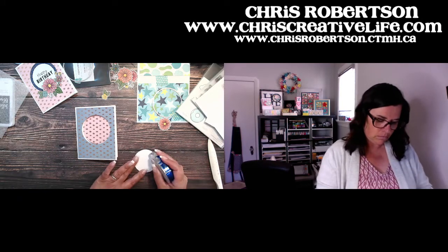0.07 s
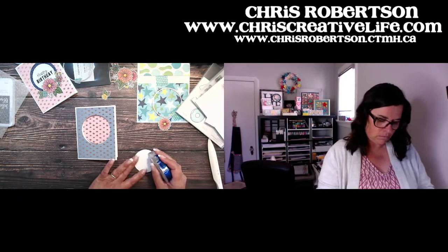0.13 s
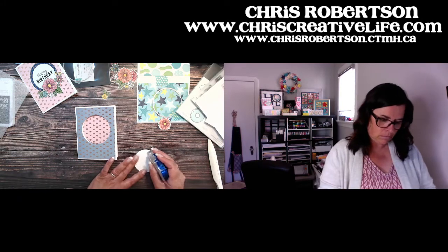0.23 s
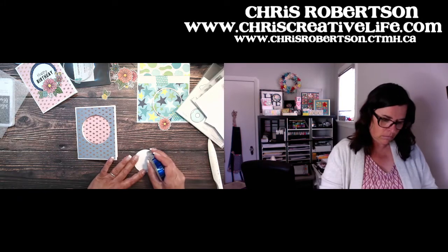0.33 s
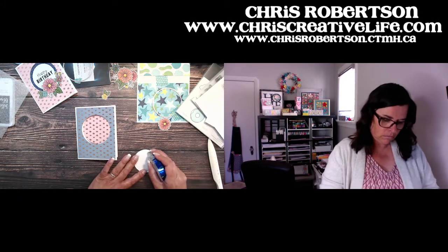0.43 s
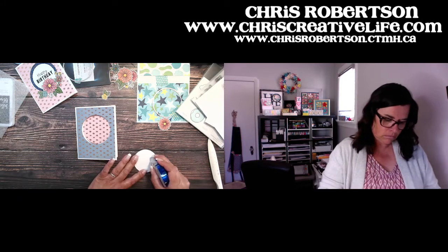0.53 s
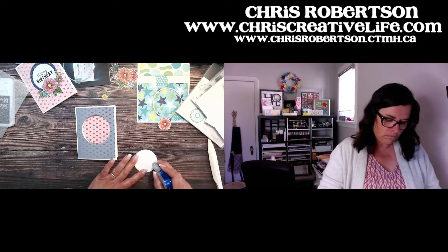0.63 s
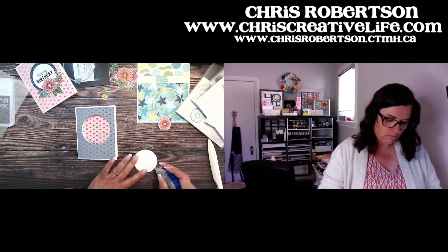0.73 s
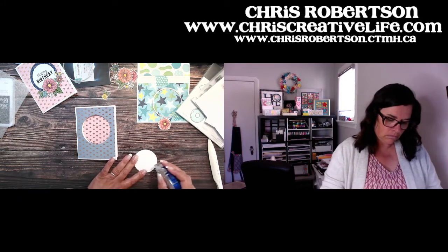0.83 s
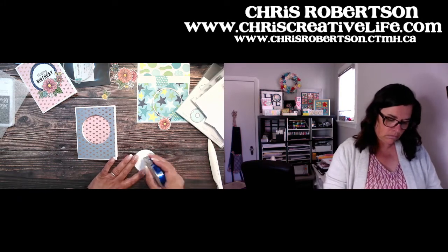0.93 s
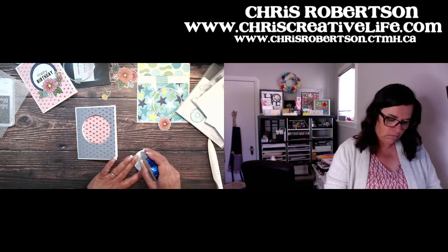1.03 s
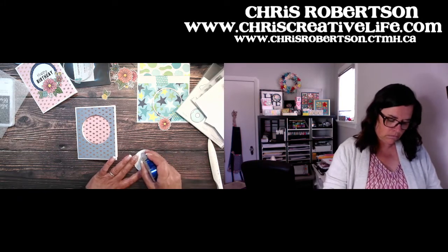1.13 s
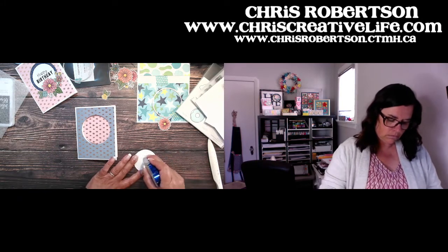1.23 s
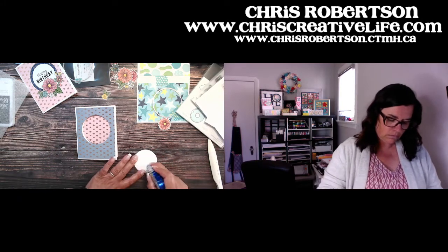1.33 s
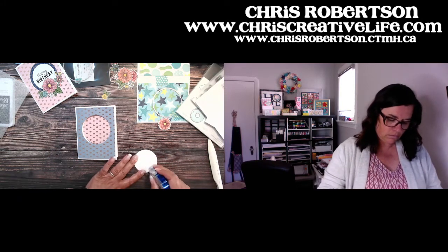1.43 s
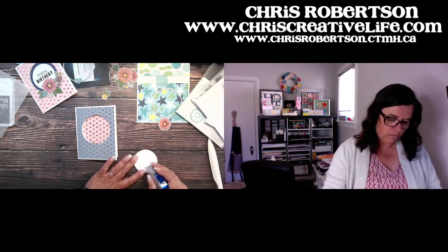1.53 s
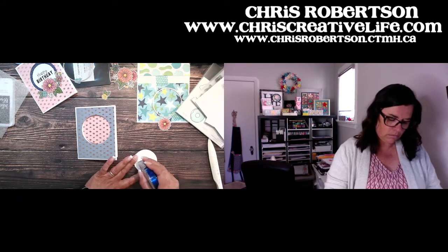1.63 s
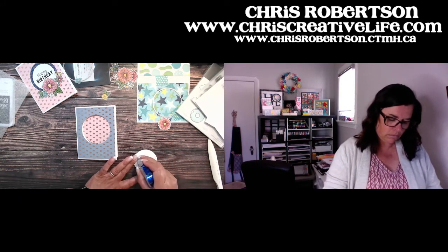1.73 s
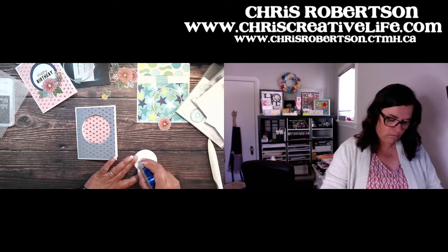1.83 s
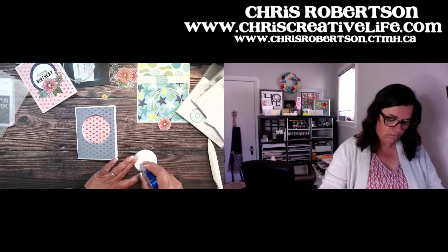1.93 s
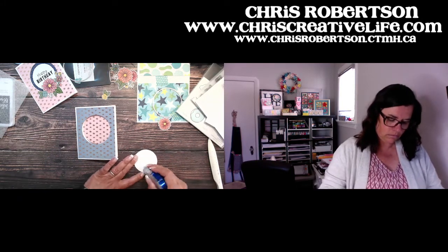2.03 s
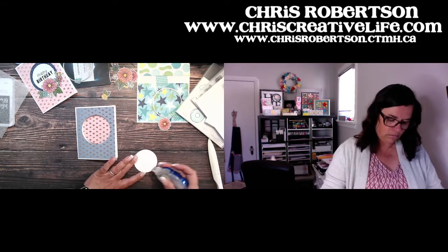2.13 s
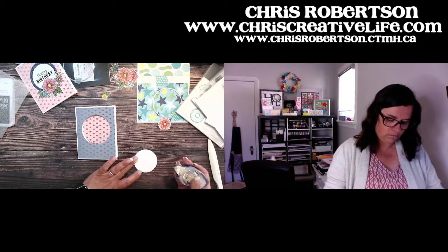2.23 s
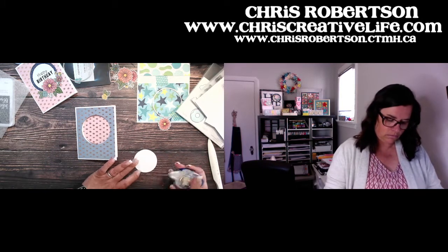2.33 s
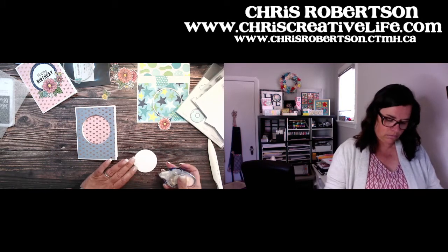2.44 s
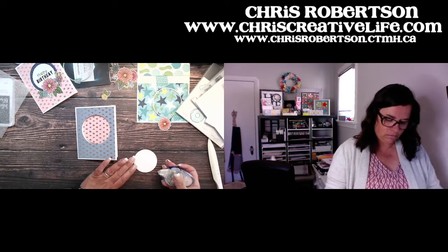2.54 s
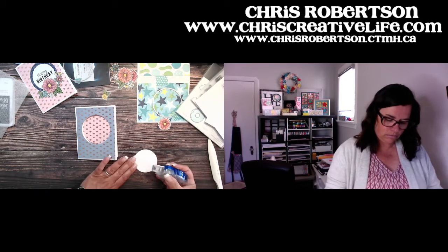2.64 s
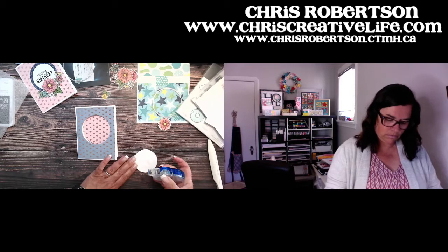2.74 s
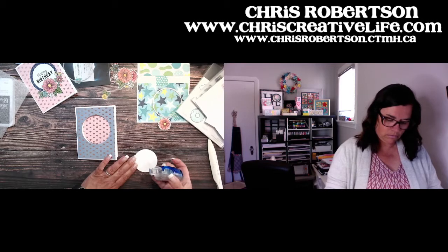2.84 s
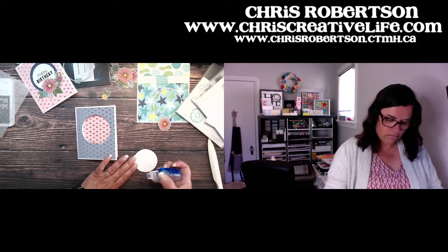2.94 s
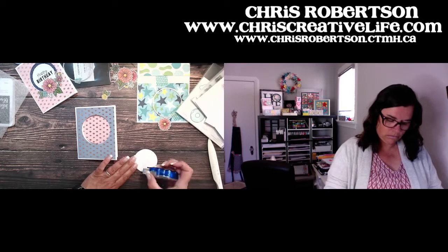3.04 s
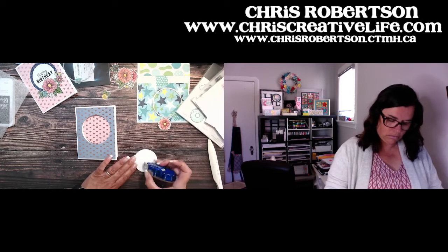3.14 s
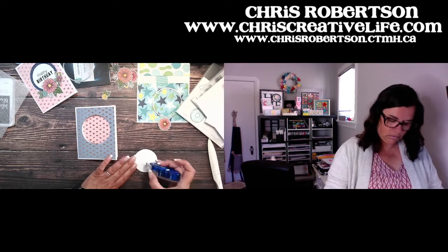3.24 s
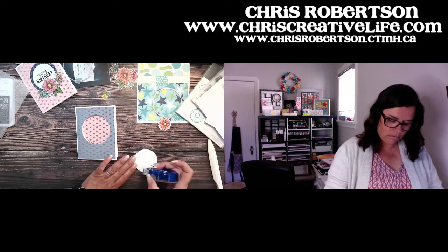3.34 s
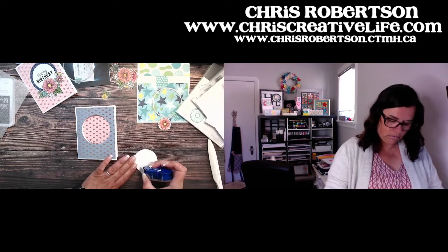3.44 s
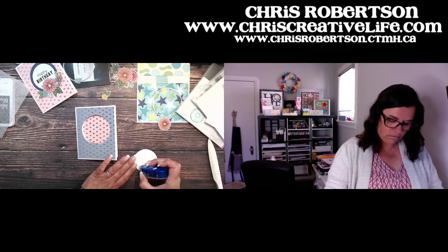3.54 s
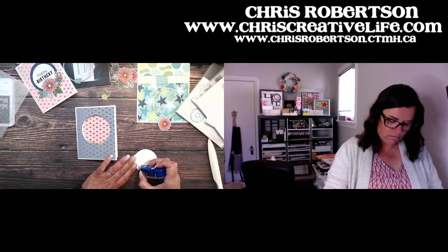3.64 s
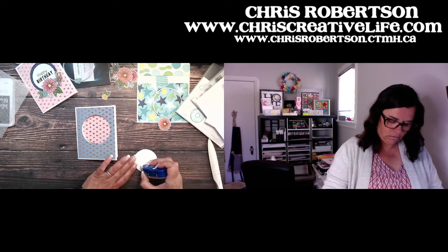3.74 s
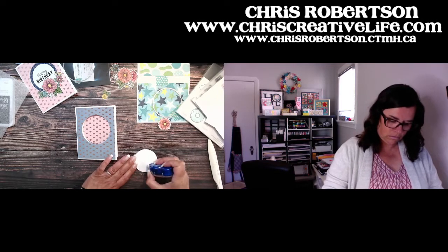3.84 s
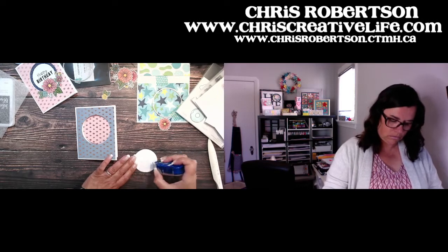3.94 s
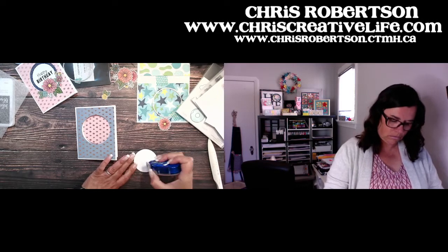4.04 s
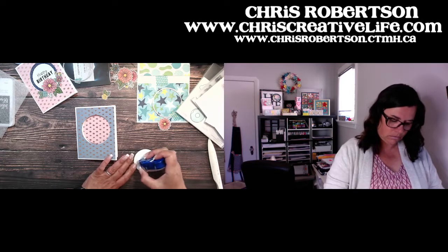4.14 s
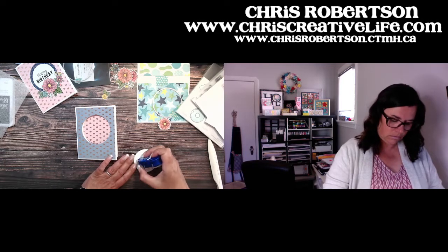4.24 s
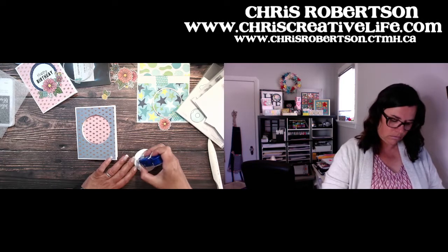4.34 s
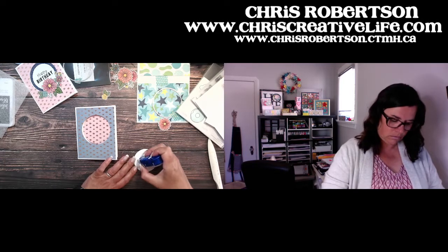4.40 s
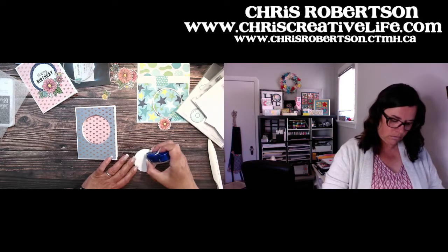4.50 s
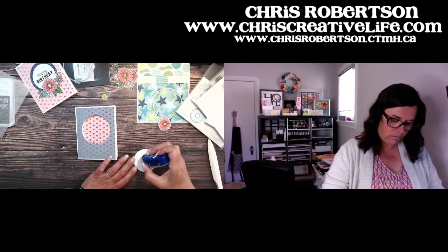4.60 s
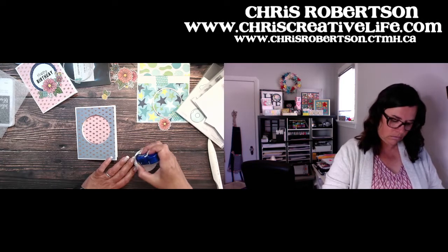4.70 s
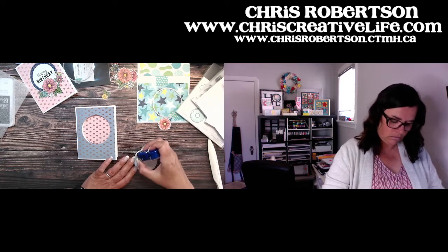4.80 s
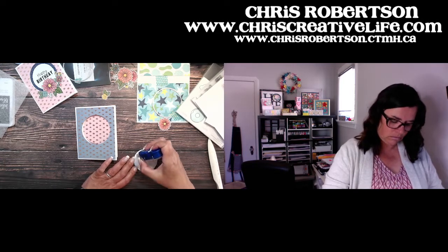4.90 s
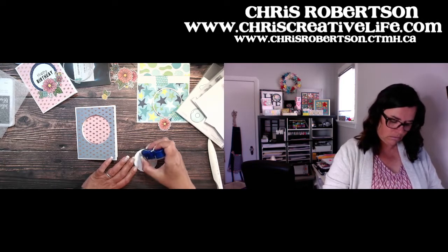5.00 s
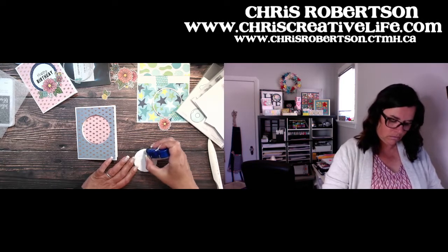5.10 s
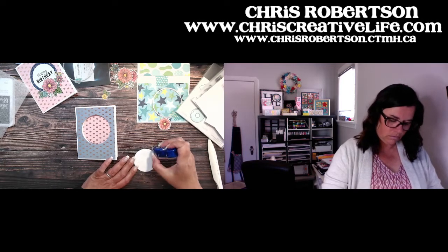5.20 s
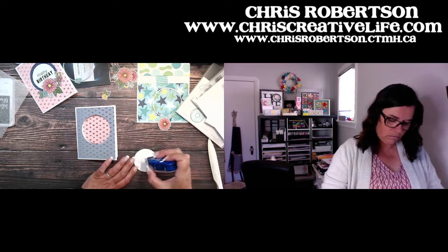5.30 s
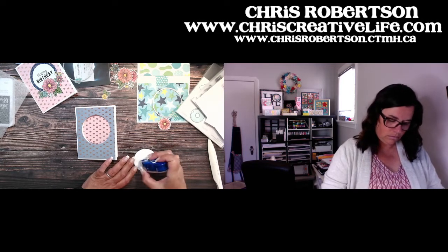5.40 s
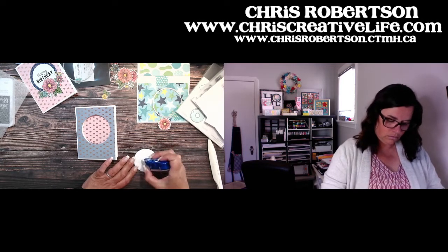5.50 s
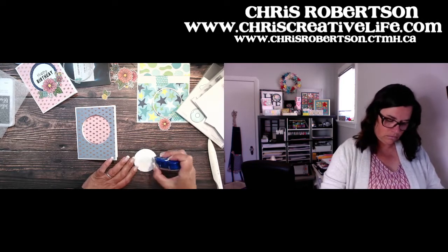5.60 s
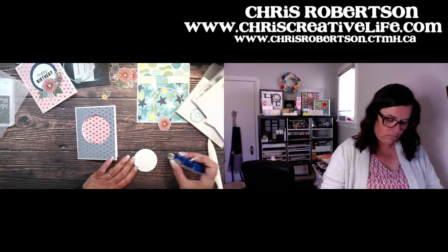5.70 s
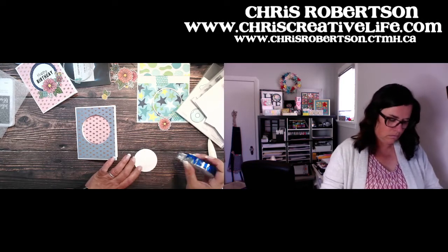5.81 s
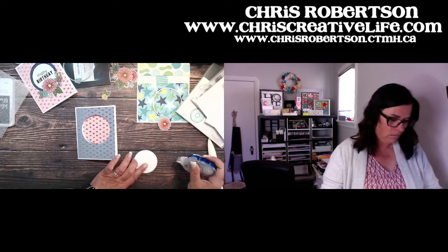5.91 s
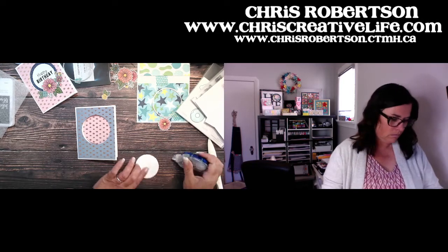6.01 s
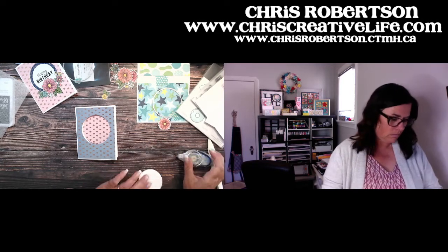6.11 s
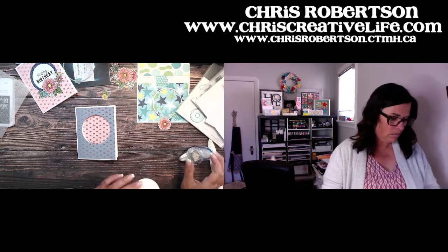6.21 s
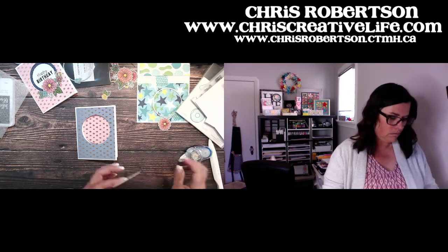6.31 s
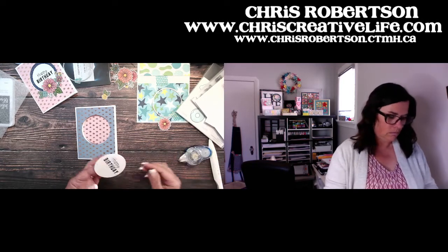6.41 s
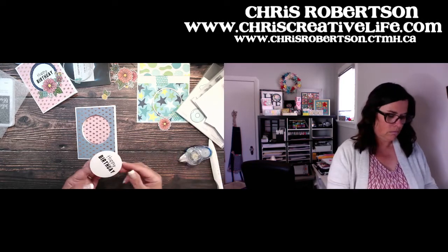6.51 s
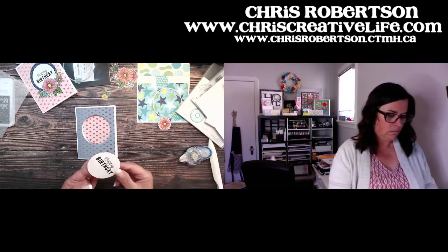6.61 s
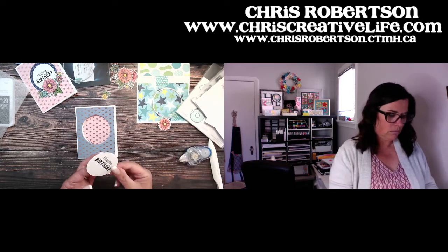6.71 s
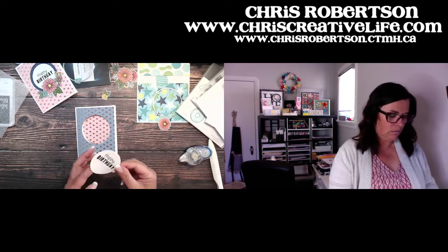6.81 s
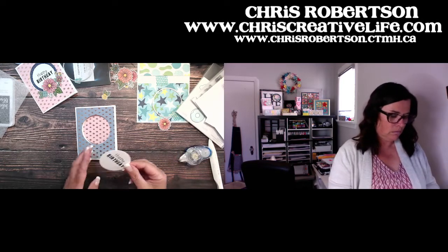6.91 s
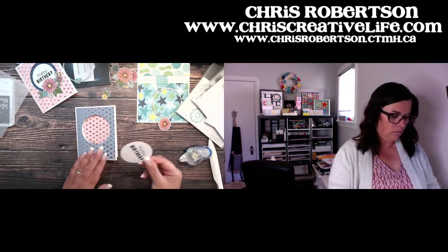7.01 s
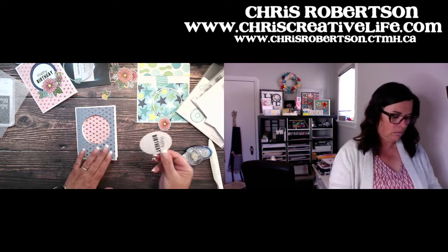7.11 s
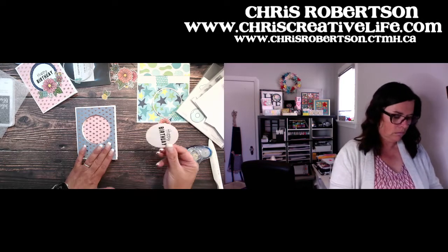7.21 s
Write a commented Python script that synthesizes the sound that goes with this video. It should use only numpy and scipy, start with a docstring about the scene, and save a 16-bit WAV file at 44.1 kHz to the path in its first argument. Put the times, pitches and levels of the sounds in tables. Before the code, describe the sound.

At a wooden craft table, a plastic tape runner makes three short ratcheting zips, bright clicks mixed with crackly peeling fizz, with stray slow ticks between. It is turned in the fingers with sharp little snaps, then four more brief zips follow. The runner is dropped, clattering and bouncing with a faint plastic ring, and fingers tick on paper. Close microphone, small room, faint low hum.

```python
"""A plastic tape runner is rolled over paper in seven short strokes: a pawl clicks over gear teeth (short puffs of
noise, each with its own pitch) while the tape peels off with a crackly fizz. Landings knock the wooden table;
a stand on it rings low (fading sine tones) and sways under the hand (slow noise). Fingers rustle on the paper and
the runner rattles in the hand (grainy noise). It is turned in the fingers, then dropped: a clatter of noise puffs
and a faintly ringing shell. All is heard from close by in a small room, over mains hum and soft room air."""
import sys
import numpy as np
from scipy import signal
from scipy.fft import rfft, irfft, next_fast_len
from scipy.io import wavfile
from scipy.ndimage import uniform_filter1d, map_coordinates

SR = 44100
rng = np.random.default_rng(int(sys.argv[2]) if len(sys.argv) > 2 else 0)


def file_out(sig):
    """Save sig as 16-bit WAV at sys.argv[1]."""
    # one column per channel
    cols = np.atleast_2d(sig).T
    # limit, then scale
    lim = np.clip(cols, -1, 1)
    pcm = np.round(lim * 32767).astype(np.int16)
    wavfile.write(sys.argv[1], SR, pcm)


def elevation(decibels):
    """Turn decibel levels (scalar or array-like) into linear amplitude ratios."""
    levels = np.asarray(decibels, float)
    return 10 ** (levels / 20)


N = 319748  # length in samples

# Room air. Each row: frequency in Hz, relative level in dB per Hz.
AIR_COLOUR = [(10, -13.5), (25, 0), (45, -2), (75, -5.5), (100, -9.5), (206, -15.5), (400, -22.5),
              (700, -30), (1400, -34.5), (7300, -42), (13600, -49), (16000, -51.5), (16600, -120)]
AIR_DB, HUM_DB, MAINS_HZ = -56.5, -49.5, 60  # rms levels, the hum's being its middle
# How fast the room falls silent. Each row: frequency in Hz, time to fade by 60 dB in seconds.
ROOM_FADE = [(300, 0.35), (1500, 0.31), (5000, 0.22), (12000, 0.16)]

# Full-roll strokes. Each row: start in seconds, hardest moment in seconds, end in seconds.
STROKE_TIMES = [(0.478, 0.69, 0.8), (1.208, 1.38, 1.49), (1.897, 2.05, 2.097), (3.803, 3.86, 3.926),
                (4.465, 4.52, 4.553), (4.935, 5.185, 5.237), (5.515, 5.655, 5.69)]
# The same strokes. Each row: rattle level in dB, weight of the hand on the table in dB.
STROKE_LEVELS = [(-38.5, -33), (-37.5, -30), (-40.5, -31.5), (-39.5, -36.5), (-38, -34), (-37, -37),
                 (-36.5, -42)]
RISE_DB_PER_S, FALL_DB_PER_S = 52, 85.5  # the rattle builds as the hand speeds up, eases off before the lift
TEETH_PER_S, SPEED_FOLLOWS = 112, 0.45  # at the hardest moment; dB of speed per dB of rattle
SLOW_BRIGHTENS = 0.32  # dB of tooth pitch gained per dB of lost speed
CASE_START_DB, CASE_END_DB = -14.5, -12.5  # hollow case against the rattle, growing along a stroke
PATCHY_DB = 4  # the colour of the roll shifts from moment to moment

# Single teeth as the roller creeps off or comes to rest. Each row: time in seconds, level in dB.
CREEP_TEETH = [(0.3401, -41), (0.3693, -33), (0.3874, -35), (0.4581, -29), (0.8473, -35.5), (0.8799, -55),
               (1.1132, -33), (1.145, -30), (1.176, -36), (1.6097, -41.5), (1.8044, -34.5), (1.8415, -33.5),
               (1.8708, -34.5), (2.15, -41), (2.1794, -33), (2.2194, -44.5), (3.6713, -36.5), (3.6825, -27),
               (3.694, -35), (3.7208, -28.5), (3.7492, -29), (3.76, -31), (3.779, -25), (3.9454, -34.5),
               (4.2867, -32.5), (4.3081, -32.5), (4.337, -28), (4.387, -37), (4.4128, -33), (4.4356, -29),
               (4.4508, -32), (4.82, -35), (4.8448, -30.5), (4.9032, -34.5), (4.9122, -39), (5.3306, -38.5),
               (5.348, -35)]
CREEP_HZ, CASE_HZ = 4480, 1380  # middle pitches of the snap and of the hollow case
CREEP_CASE_DB, CASE_FOLLOWS = -63.5, 0.39  # case level at a -34.5 dB tooth; dB of case per dB of tooth
# Landings and finger contacts on the runner or paper. Each row: time in seconds, level in dB, snap pitch in Hz,
# hollow part in dB against that level, hollow pitch in Hz.
TOUCHES = [(0.1257, -47.5, 6000, -14, 2220), (0.2982, -42, 2930, -9, 1250), (0.3144, -46.5, 2900, -5, 1740),
           (1.067, -29.5, 3720, -9.5, 990), (1.5568, -45, 3700, -11, 1480),
           (1.7398, -21.5, 3570, -8.5, 1490), (2.5448, -42, 2930, -3, 1560),
           (2.5603, -32.5, 8800, -12.5, 1610), (2.565, -26.5, 6160, -25, 2130),
           (2.6831, -28, 3450, -13, 1500), (2.6911, -12, 9600, -12.5, 1670),
           (2.8159, -31.5, 10100, -18.5, 1360), (2.9278, -47, 7890, -13, 1250),
           (2.9473, -47, 3420, 0, 2240), (2.9782, -42.5, 5150, -5, 1630), (3.0627, -52, 2860, -8, 1750),
           (3.193, -26, 7900, -22, 2100), (3.2832, -45, 3330, -9, 1510), (3.615, -49, 3560, -1, 1270),
           (4.2358, -41.5, 3700, -1.5, 746), (4.359, -46, 9000, -7, 1300), (4.6728, -46.5, 5700, -25, 724),
           (4.774, -21.5, 4450, -11.5, 1610), (5.4815, -18.5, 6100, -13.5, 1750),
           (5.9745, -29, 7400, -19.5, 774), (6.0429, -25, 2960, -6, 1780), (6.133, -36, 5050, -15.5, 1504),
           (6.711, -41.5, 3200, -25, 1730), (6.7238, -64.5, 5220, 9.5, 742),
           (6.7691, -24.5, 3150, -32, 1260), (6.8644, -29.5, 3200, -26, 1680),
           (6.8765, -24.5, 3220, -25, 1360)]

# Click colour with the runner held nose forward. Each row: frequency in Hz, relative level in dB per Hz.
FORWARD_COLOUR = [(1290, -38), (2200, -17), (3390, -1.5), (3650, -4), (4570, -5.5), (4800, -5), (5300, -1),
                  (5720, -6.5), (6530, -2.5), (7150, -6), (8170, -2.5), (9480, -8), (13300, -11),
                  (15100, -12), (16000, -29)]
# Click colour when lifted in the fingers. Each row: frequency in Hz, relative level in dB per Hz.
LIFTED_COLOUR = [(1000, -36), (1700, -4.5), (2170, -4), (2720, -9), (3440, -2), (4300, -6), (6320, -3.5),
                 (10000, -9.5), (10500, -14), (14800, -17), (16000, -27)]
# Click colour when held sideways. Each row: frequency in Hz, relative level in dB per Hz.
SIDEWAYS_COLOUR = [(1290, -41.5), (2200, -15.5), (2270, -10.5), (2730, -14.5), (3360, -1.5), (3650, -8.5),
                   (3840, -5.5), (4610, -10.5), (6310, -6.5), (7270, -12), (8030, -7.5), (9250, -11),
                   (9970, -11.5), (15100, -19.5), (16000, -36.5)]
# Hollow plastic case. Each row: frequency in Hz, relative level in dB per Hz.
CASE_COLOUR = [(410, -31.5), (700, -9), (843, -12.5), (1020, -9.5), (1090, -6), (1480, -0.5), (1860, -10),
               (2320, -7), (2500, -20.5), (3250, -40), (5500, -120)]
LIFT_S, TURN_S, REST_S = 2.3, 3.4, 6.6  # once the runner rests, the ticks are fingers on the paper

# Blows felt by the table top. Each row: time in seconds, level in dB, stand ring in dB against that level.
TABLE_BLOWS = [(0.457, -51.5, -1), (1.067, -33, 2), (1.739, -27.5, -0.5), (3.684, -43, -6.5),
               (4.235, -37, -3), (4.774, -30.5, -2), (5.481, -29, -1), (6.042, -24.5, -2), (6.144, -24, -1),
               (6.221, -25.5, -1), (6.767, -47.5, -10.5)]
# Wooden table top. Each row: frequency in Hz, relative level in dB per Hz.
WOOD_COLOUR = [(53, -31), (90, -10), (113, -4), (394, 0), (593, -10), (694, -12), (856, -24.5),
               (1010, -13.5), (1100, -18), (1430, -48), (2420, -120)]
# Tones (modes) of a stand on the table. Each row: frequency in Hz, relative level in dB,
# time to fade by 60 dB in seconds, build-up time in seconds.
STAND_MODES = [(43, -2, .5, .03), (76, -14, .5, .02), (170, -12, .3, .01), (210, -13, .4, .02),
               (259, -10, .22, .005), (366, 0, .38, .03), (366, -27, 1.0, .05), (415, -20, .4, .02)]
LET_GO_S = 6  # from here the blows lack the arm's weight and leave the two lowest modes still
LEAN_S, LEAN_LAG_S, SETTLE_S = 0.28, 0.028, 0.38  # lean in before a stroke, peak just late, settle after it
REST_DB = -50.5  # idle rocking

# Rustles: fingers slide on paper; the row near 6 s is the runner rattling in the hand.
# Each row: start in seconds, loudest moment in seconds, end in seconds, rms level in dB.
RUSTLES = [(2.287, 2.385, 2.61, -64.5), (4.565, 4.608, 4.68, -64.5), (5.7, 5.744, 5.89, -58.5),
           (5.982, 6.044, 6.44, -53.5), (6.649, 6.655, 6.76, -74), (6.853, 6.878, 6.92, -46.5)]
# Colour of the rustles and of the last finger ticks on paper. Each row: frequency in Hz, relative level in dB per Hz.
PAPER_COLOUR = [(180, -38), (300, -4), (900, -11), (1410, -7), (2280, -11), (3000, -7), (4500, -8.5),
                (7950, -8), (12000, -18.5), (16000, -28)]
RUSTLE_IN_DB, RUSTLE_OUT_DB = -11, -13  # ends of a rustle against its loudest moment

# The runner drops on the table and bounces. Each row: time in seconds, level in dB, resonance of the contact in Hz,
# strength of that resonance in dB.
DROP_CONTACTS = [(6.118, -32, 1750, 17), (6.144, -6.5, 2060, 5), (6.223, -6.5, 4070, -6),
                 (6.334, -35, 1800, 18)]
# Clatter of the dropped runner. Each row: frequency in Hz, relative level in dB per Hz.
CLATTER_COLOUR = [(290, -31), (500, -6), (807, -5.5), (933, -11), (1230, -2.5), (1550, -6), (2690, -12),
                  (3920, -3.5), (4280, -11), (5880, -9.5), (6420, -15), (7640, -10.5), (8830, -19.5),
                  (11800, -23.5), (16000, -40.5)]
# The shell rings on. Each row: frequency in Hz, relative level in dB, time to fade by 60 dB in seconds.
SHELL_MODES = [(1370, -3.0, 0.38), (1615, 2.5, 0.27), (3210, -10.5, 0.24), (3800, -1.0, 0.19),
               (5400, -12, 0.148), (5700, -2.5, 0.0955), (5870, -22.0, 0.28), (7400, -12, 0.21),
               (7790, -18.0, 0.15), (8620, -4, 0.14), (2700, -24.0, 0.89)]

TOP_HZ = 16000  # band limit of the microphone path


def unit(x):
    """Scaled to rms 1."""
    return x / np.sqrt(np.mean(x ** 2) + 1e-20)


def along(points, hz):
    """(Hz, value) points read on a log axis."""
    f, v = np.transpose(points)
    return np.interp(np.log(hz + 1), np.log(f + 1), v)


def coloured(x, spectrum):
    """x through a spectrum that keeps the power of white noise."""
    size = next_fast_len(N + 8192)
    gain = unit(elevation(along(spectrum, np.fft.rfftfreq(size, 1 / SR))))
    return irfft(rfft(x, size) * gain, size)[:N]


def swell(t, start, top, end, db, in_db, out_db):
    """dB that rise to a top and fall again, silent outside."""
    return np.interp(t, [start, top, end], [db + in_db, db, db + out_db], -120, -120)


def bursts(times, db, rise, t60, even, ring_hz=1, ring_db=-60, sharp=5):
    """Noise puffs that swell and die; even 0-1 flattens each one's chance colour, ring_hz adds a resonance."""
    t = np.arange(SR // 20) / SR
    shape = (1 - np.exp(-(t / rise) ** 2)) * elevation(-60 * t / t60)
    tones = rfft(shape * rng.standard_normal((len(times), len(t))))
    flatter = tones / (np.abs(tones) + 1e-9) ** np.clip(even, 0, 1)
    tones = rfft(shape * irfft(flatter, len(t)))
    f, centre = np.fft.rfftfreq(len(t), 1 / SR), np.reshape(ring_hz, (-1, 1))
    damping = 1j * f * centre / sharp
    resonance = damping / (centre ** 2 - f ** 2 + damping)
    puffs = irfft(tones * (1 + elevation(ring_db) * resonance), len(t))
    # every puff gets the energy its shape would have at a peak of db
    energy = np.linalg.norm(shape / shape.max())
    puffs *= elevation(db)[:, None] * energy / np.linalg.norm(puffs, axis=1, keepdims=True)
    at = np.round(np.asarray(times) * SR).astype(int)[:, None] + np.arange(len(t))
    return np.bincount(at.ravel(), puffs.ravel(), N + SR)[:N]


def ringing(events, modes, spread_db):
    """Every blow rings the same fading tones; spread_db varies their strengths by chance."""
    out, t = np.zeros(N + SR), np.arange(SR) / SR
    for s, db in events:
        ring = np.zeros(SR)
        for hz, mode_db, t60, build in modes:
            fade = elevation(db + mode_db + rng.normal(0, spread_db) - 60 * t / t60)
            ring += fade * (1 - np.exp(-t / build)) * np.sin(2 * np.pi * hz * t)
        out[round(s * SR):][:SR] += ring[:len(out) - round(s * SR)]
    return out[:N]


def rolling(t):
    """At times t: rattle dB, hollow case dB, teeth a second."""
    rattle, case, rate = [], [], 0
    for (start, top, end), (db, _) in zip(STROKE_TIMES, STROKE_LEVELS):
        in_db, out_db = RISE_DB_PER_S * (start - top), FALL_DB_PER_S * (top - end)
        rattle.append(swell(t, start, top, end, db, in_db, out_db))
        case.append(rattle[-1] + np.interp(t, [start, end], [CASE_START_DB, CASE_END_DB]))
        speed = elevation(SPEED_FOLLOWS * (rattle[-1] - db))
        rate = rate + TEETH_PER_S * speed * (t >= start) * (t <= end)
    return np.max(rattle, axis=0), np.max(case, axis=0), rate


def background():
    """Room air is coloured noise; mains hum is one low tone that wavers a little."""
    waver = map_coordinates(rng.standard_normal(60), [np.linspace(1, 58, N)])
    tone = np.sqrt(2) * np.sin(2 * np.pi * MAINS_HZ * np.arange(N) / SR)
    hum = elevation(HUM_DB + 1.5 * waver) * tone
    return hum + elevation(AIR_DB) * coloured(rng.standard_normal(N), AIR_COLOUR)


def stand():
    """The stand rings after each blow, hums while the roller shakes the table, and rocks slowly near 15 Hz."""
    leaning = [(s, db + ring_db) for s, db, ring_db in TABLE_BLOWS if s < LET_GO_S]
    let_go = [(s, db + ring_db) for s, db, ring_db in TABLE_BLOWS if s >= LET_GO_S]
    ring = ringing(leaning, STAND_MODES, spread_db=0.0) + ringing(let_go, STAND_MODES[2:], spread_db=0.0)
    t, now = np.arange(SR) / SR, np.arange(N) / SR
    modes = sum(elevation(db - 60 * t / t60) * np.sin(2 * np.pi * hz * t) for hz, db, t60, _ in STAND_MODES)
    shaking = elevation(rolling(now)[1]) * rng.standard_normal(N)
    hums = elevation(-37.5) * signal.fftconvolve(shaking, modes)[:N] + elevation(-9.5) * coloured(shaking, WOOD_COLOUR)
    slow = [(8, -49), (13, -3), (15.5, -1), (18, -7.5), (28, -46), (60, -120)]  # (Hz, relative dB per Hz)
    rocking = coloured(rng.standard_normal(N), slow)
    # dividing by its own recent strength makes the swing steady
    swing = rocking / np.sqrt(np.abs(uniform_filter1d(rocking ** 2, size=SR // 5)) + 0.05)
    weight = elevation(REST_DB)
    for (start, top, end), (_, db) in zip(STROKE_TIMES, STROKE_LEVELS):
        weight = weight + elevation(swell(now, start - LEAN_S, top + LEAN_LAG_S, end + SETTLE_S, db, -24, -20))
    return ring + hums + weight * swing


def teeth(rate, count=48):
    """Tooth times, count a stroke: the first at its start, one each time the gear has turned a tooth on."""
    t, turned = np.arange(N) / SR, np.cumsum(rate + 0.0011) / SR  # the tiny extra keeps turned rising
    first = np.interp([row[0] + 1e-3 for row in STROKE_TIMES], t, turned)
    end = np.array([row[2] for row in STROKE_TIMES])[:, None]
    times = np.interp(first[:, None] + np.arange(count), turned, t)
    return np.minimum(times, end).ravel(), (times < end).ravel()


def patchy(x, depth_db):
    """x with random gain patches about 900 Hz wide and 40 ms long."""
    z = signal.stft(x, nperseg=256)[2]
    field = uniform_filter1d(rng.standard_normal(z.shape), size=5, axis=0)
    field = unit(uniform_filter1d(field, size=14, axis=1))
    return signal.istft(z * elevation(depth_db * field), nperseg=256)[1][:N]


def touches():
    """Landings and finger contacts: a bright snap and a hollow knock, each a puff with its own resonance."""
    s, db, snap_hz, case_db, case_hz = np.transpose(TOUCHES)
    bright = bursts(s - 0.0015, db - 13, rise=0.0019, t60=0.041, even=0.31,
                    ring_hz=snap_hz, ring_db=2.5, sharp=4)
    hollow = bursts(s - 0.0015, db + case_db - 10.5, rise=0.0026, t60=0.045, even=0.55,
                    ring_hz=case_hz, ring_db=6.5, sharp=2.6)
    return bright, hollow


def creeping():
    """Single slow teeth: each snaps at a chance pitch and knocks the hollow case."""
    s, db = np.transpose(CREEP_TEETH)
    chance = rng.standard_normal((len(s), 3))
    snap_hz = np.clip(CREEP_HZ * np.exp(0.39 * chance[:, 0]), 2500, 13000)
    bright = bursts(s - 0.0015, db - 13, rise=0.0016, t60=0.043, even=0.11,
                    ring_hz=snap_hz, ring_db=6, sharp=3.7)
    case_db = CREEP_CASE_DB + CASE_FOLLOWS * (db + 34.5) + 4.4 * chance[:, 1]
    case_hz = CASE_HZ * np.exp(0.12 * chance[:, 2])
    hollow = bursts(s - 0.0015, case_db, rise=0.0015, t60=0.046, even=1.0,
                    ring_hz=case_hz, ring_db=5, sharp=1.5)
    return bright, hollow


def strokes():
    """The pawl snaps over each passing tooth, and the tape peels with a fizz that grows with its speed."""
    rattle_db, _, rate = rolling(np.arange(N) / SR)
    at, passed = teeth(rate)
    click_db, hollow_db, local_rate = rolling(at)
    chance = rng.standard_normal((len(at), 4))
    times = at - 0.002 + 0.0012 * chance[:, 0]  # the hand is uneven
    # fewer clicks carry the same rattle: each is stronger
    sparse_db = 10 * np.log10(100 / np.clip(local_rate, 55, 170))
    size_db = np.where(passed, click_db, -120) + sparse_db - 0.3 + 1.1 * chance[:, 1]
    # each tooth snaps at its own pitch
    tooth_hz = 5200 * elevation(SLOW_BRIGHTENS * 2 * sparse_db) * np.exp(0.422 * chance[:, 3])
    roll = bursts(times, size_db - 1, rise=0.0021, t60=0.037, even=0.3,
                  ring_hz=np.clip(tooth_hz, 2500, 13000), ring_db=7.5, sharp=13.5)
    hollow_db = np.where(passed, hollow_db, -120) + 2.25 * chance[:, 2]
    hollow = bursts(times, hollow_db, rise=0.003, t60=0.063, even=0.097)
    crackle = elevation(3.5 * unit(uniform_filter1d(rng.standard_normal(N), size=60)))
    peel = (rate / TEETH_PER_S) ** 0.6 * elevation(rattle_db)
    fizz = elevation(-5) * peel * unit(crackle * rng.standard_normal(N))
    return patchy(roll + fizz, PATCHY_DB), hollow


def runner():
    """Touches, single teeth and strokes: bright parts take the colour of the hold, hollow ones the case's."""
    parts = [touches(), creeping(), strokes()]
    bright = sum(part[0] for part in parts)
    hollow = sum(part[1] for part in parts)
    t = np.arange(N) / SR
    lifted = (t > LIFT_S) & (t <= TURN_S)
    sideways = (t > TURN_S) & (t <= REST_S)
    colours = [(t <= LIFT_S, FORWARD_COLOUR), (lifted, LIFTED_COLOUR),
               (sideways, SIDEWAYS_COLOUR), (t > REST_S, PAPER_COLOUR)]
    return sum(coloured(bright * held, colour) for held, colour in colours) + coloured(hollow, CASE_COLOUR)


def thud():
    """The dull push of each blow on the table top: a noise puff coloured by the wood."""
    s, db, _ = np.transpose(TABLE_BLOWS)
    return coloured(bursts(s - 0.001, db - 5.0, rise=0.0028, t60=0.053, even=0.34), WOOD_COLOUR)


def rustling():
    """Fingers sliding on paper, and once the runner rattling in the hand: uneven grainy noise."""
    grain = elevation(2.5 * unit(uniform_filter1d(rng.standard_normal(N), size=200)))
    now = np.arange(N) / SR
    loudness = sum(elevation(swell(now, *row, RUSTLE_IN_DB, RUSTLE_OUT_DB)) for row in RUSTLES)
    return loudness * coloured(unit(grain * rng.standard_normal(N)), PAPER_COLOUR)


def drop():
    """A broad, short clatter, each contact favouring one resonance; the shell rings on faintly."""
    s, db, contact_hz, contact_db = np.transpose(DROP_CONTACTS)
    blows = bursts(s - 0.0015, db - 8.5, rise=0.0027, t60=0.041, even=0.5,
                   ring_hz=contact_hz, ring_db=contact_db[:, None], sharp=4)
    shell = [(hz, mode_db - 34, t60, 0.001) for hz, mode_db, t60 in SHELL_MODES]
    return coloured(blows, CLATTER_COLOUR) + ringing(np.transpose([s, db]), shell, spread_db=1.5)


def room(x):
    """Echoes as fading noise: each frequency dies at its own speed, drawn anew every quarter second."""
    out, step = np.zeros(N + SR), SR // 4
    for start in range(0, N, step):
        hz, t, z = signal.stft(rng.standard_normal(SR // 2), SR, nperseg=256)
        fade = elevation(-60 * t / along(ROOM_FADE, hz)[:, None])
        tail = signal.istft(z * fade, SR, nperseg=256)[1][:SR // 2]
        answer = signal.fftconvolve(x[start:start + step], tail / np.linalg.norm(tail))
        out[start + 200:][:len(answer)] += answer  # the room answers 200 samples late
    return out[:N]


def scene():
    """Near sounds with their room, over the stand's lows and the background."""
    near = runner() + drop() + rustling() + thud()
    return (near + elevation(-6.5) * room(near) + stand() + background())[None]


def top_cut(x):
    """Nothing passes above the cut-off."""
    return signal.sosfilt(signal.butter(12, 16680, fs=SR, output="sos"), x)


def record(dry):
    """The microphone path stops at its band limit: a steep low-pass run forwards and backwards."""
    low_pass = signal.cheby2(14, 20, TOP_HZ, fs=SR, output="sos")
    narrow = signal.sosfiltfilt(low_pass, dry)
    return top_cut(narrow)


dry = scene()
out = record(dry)
file_out(out)
```